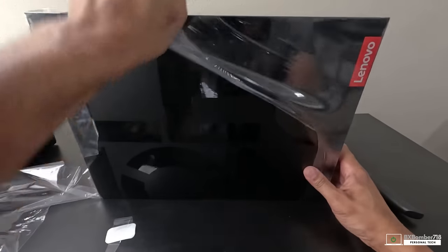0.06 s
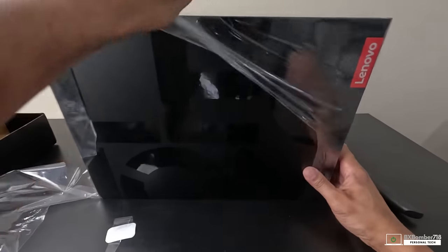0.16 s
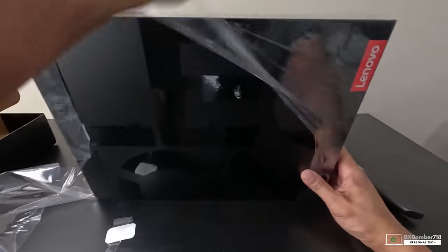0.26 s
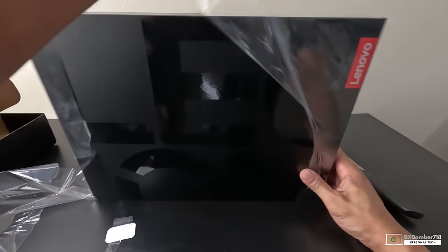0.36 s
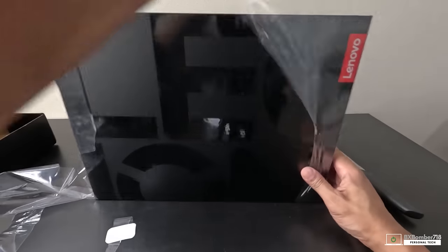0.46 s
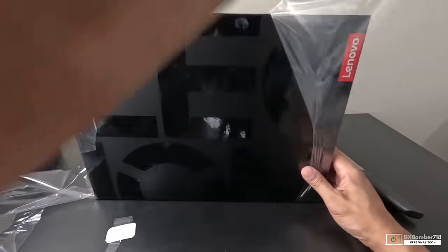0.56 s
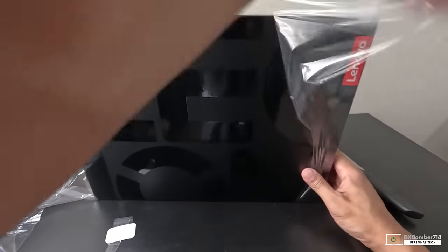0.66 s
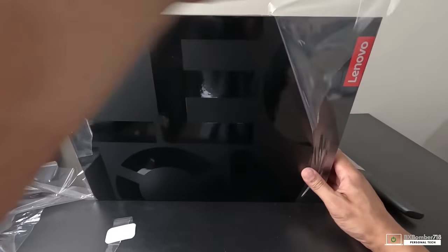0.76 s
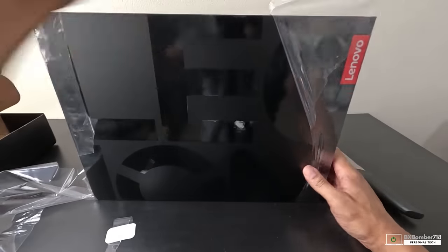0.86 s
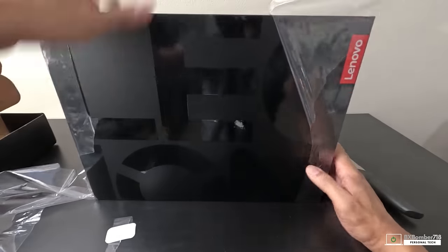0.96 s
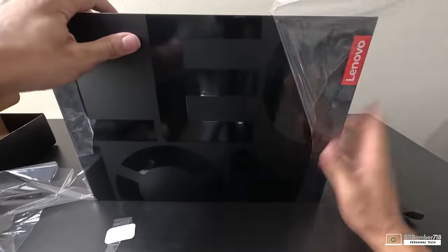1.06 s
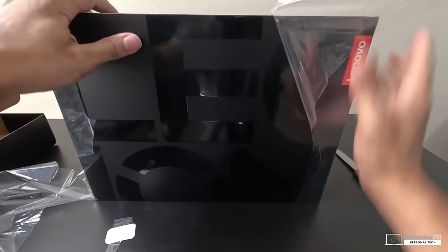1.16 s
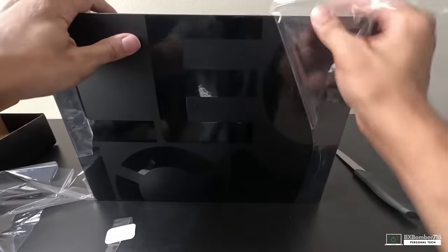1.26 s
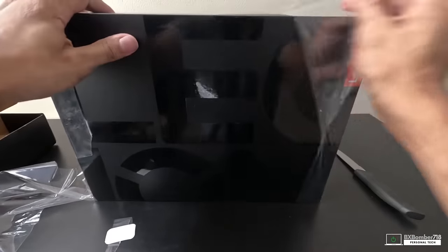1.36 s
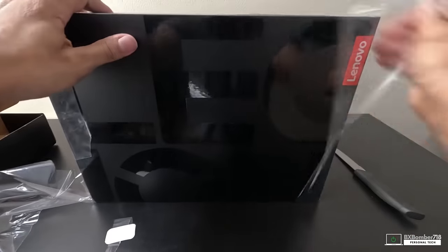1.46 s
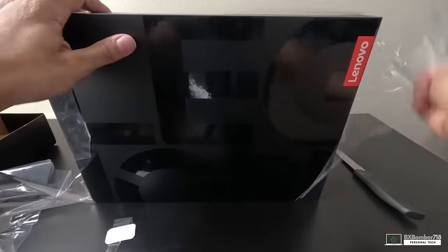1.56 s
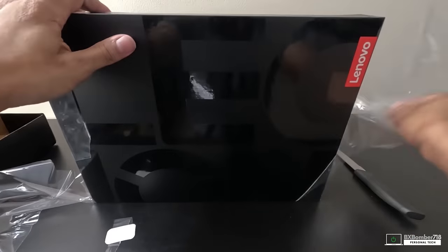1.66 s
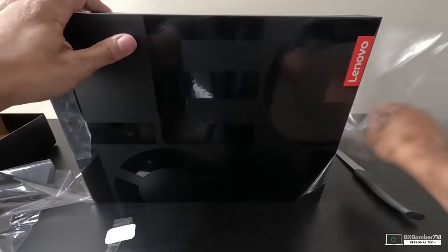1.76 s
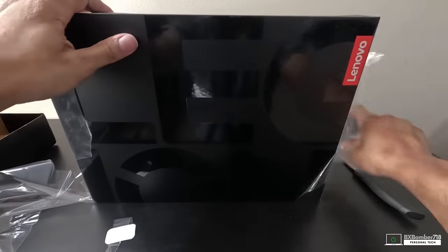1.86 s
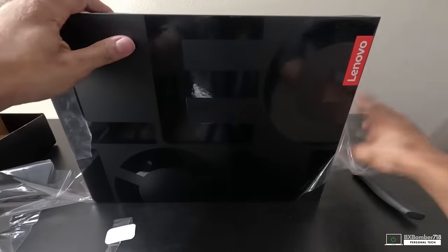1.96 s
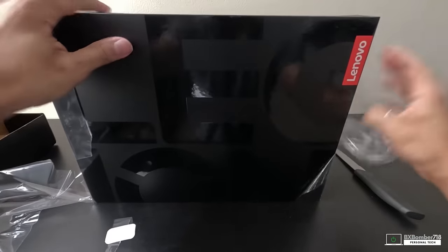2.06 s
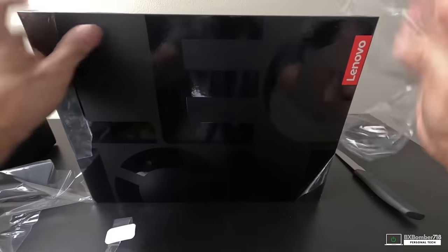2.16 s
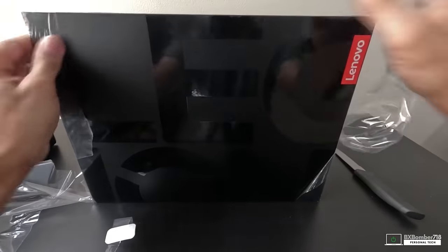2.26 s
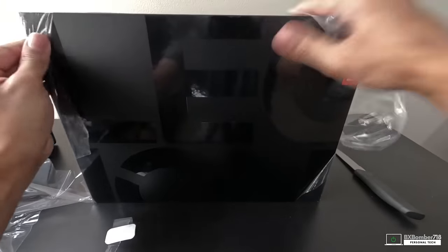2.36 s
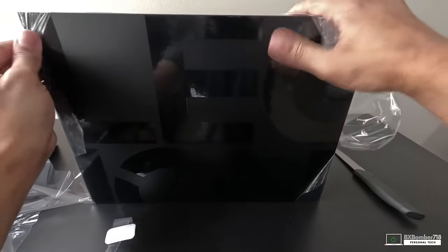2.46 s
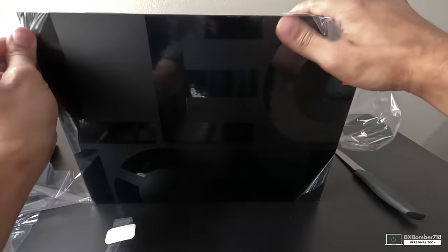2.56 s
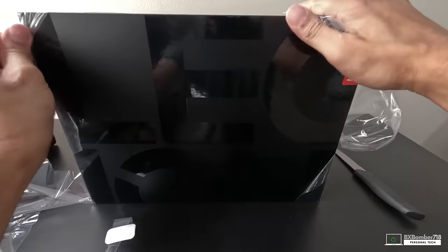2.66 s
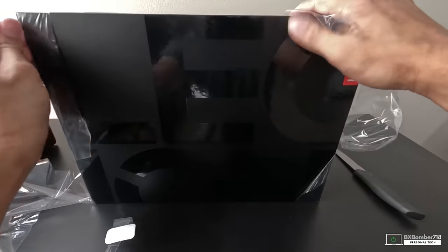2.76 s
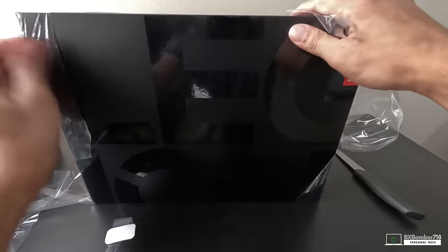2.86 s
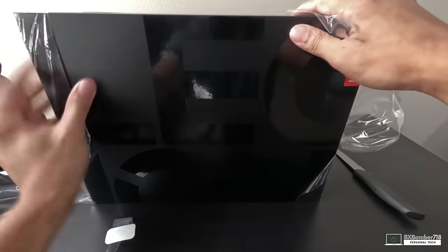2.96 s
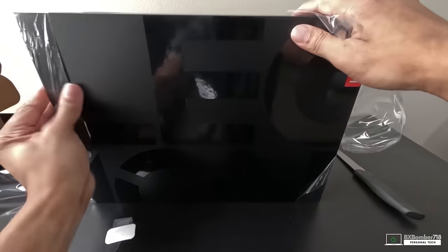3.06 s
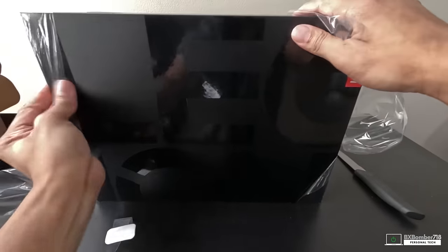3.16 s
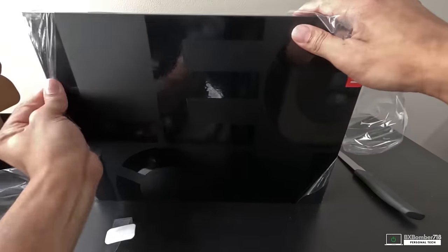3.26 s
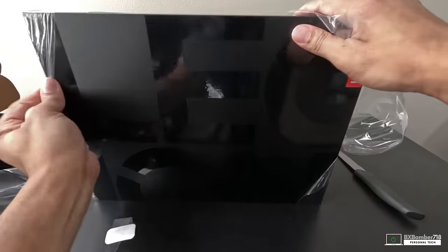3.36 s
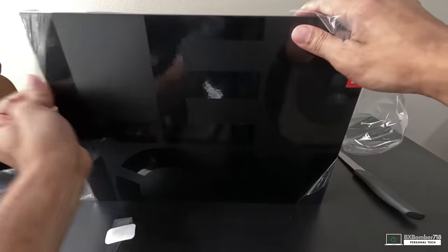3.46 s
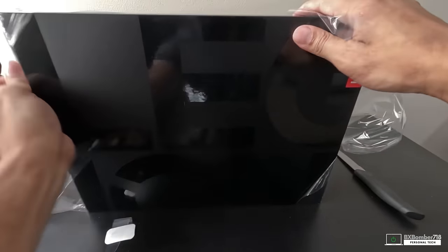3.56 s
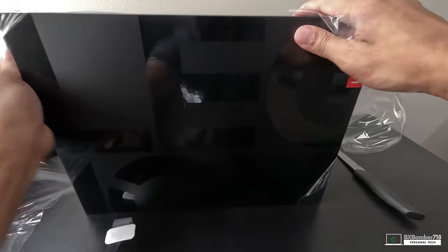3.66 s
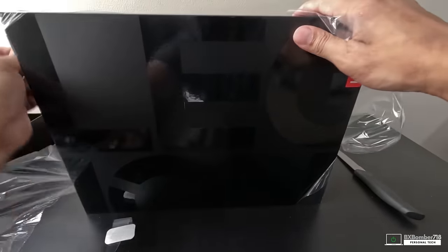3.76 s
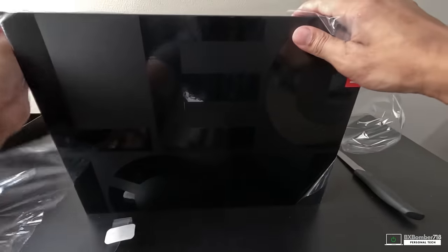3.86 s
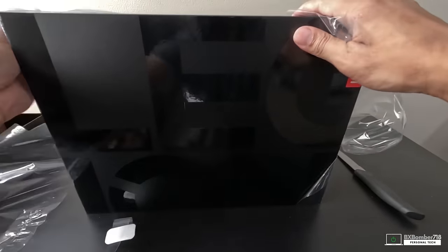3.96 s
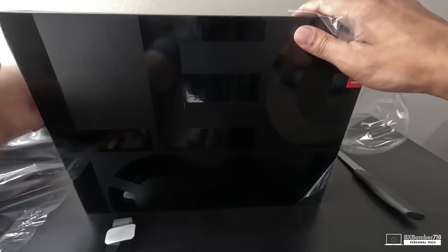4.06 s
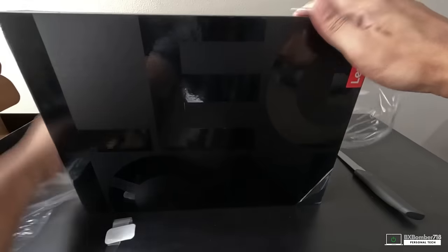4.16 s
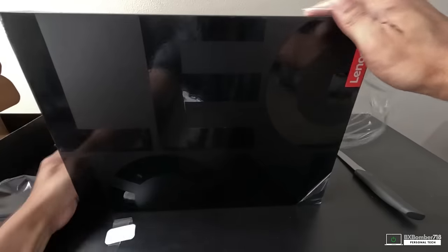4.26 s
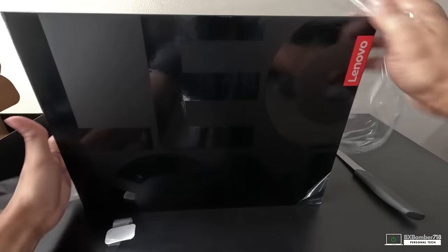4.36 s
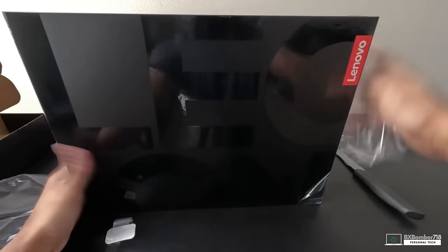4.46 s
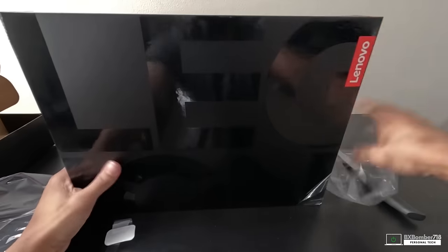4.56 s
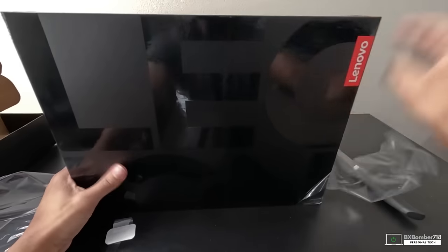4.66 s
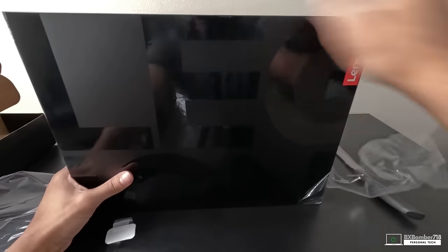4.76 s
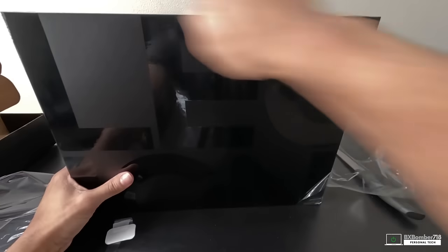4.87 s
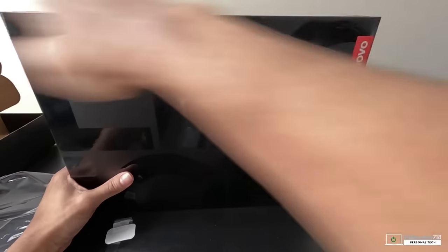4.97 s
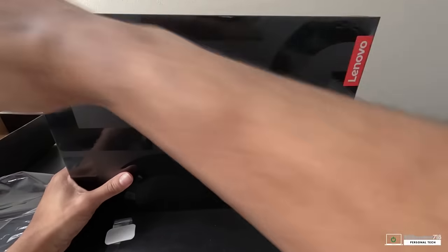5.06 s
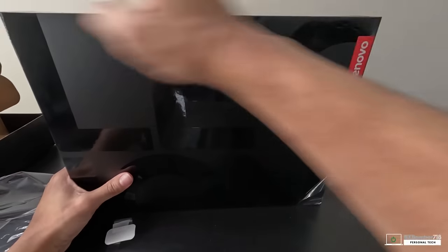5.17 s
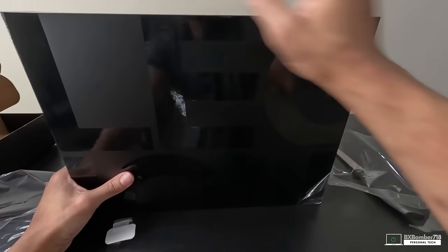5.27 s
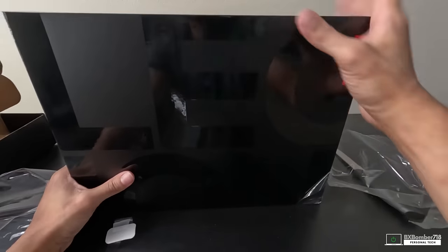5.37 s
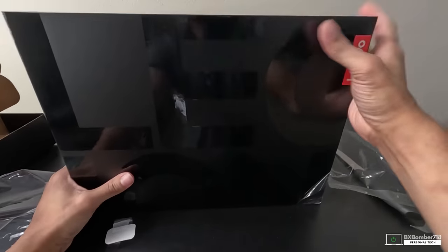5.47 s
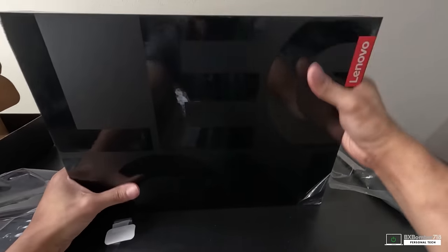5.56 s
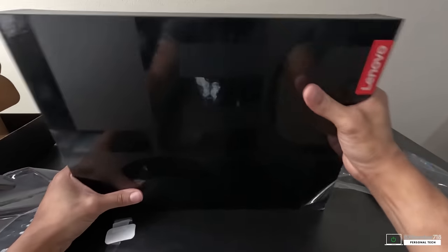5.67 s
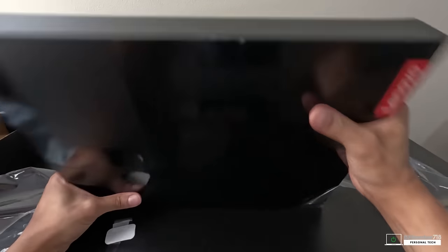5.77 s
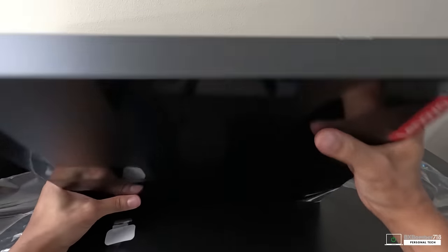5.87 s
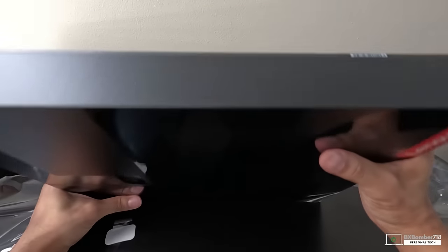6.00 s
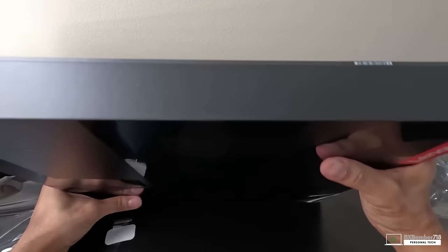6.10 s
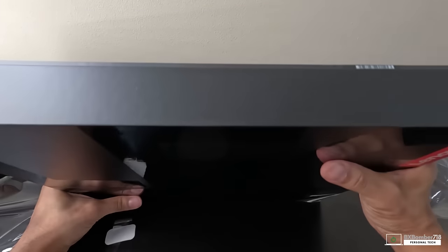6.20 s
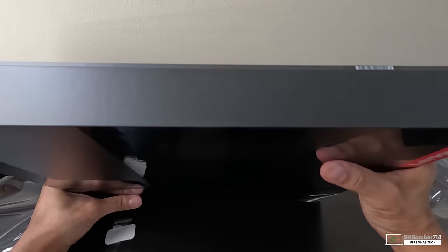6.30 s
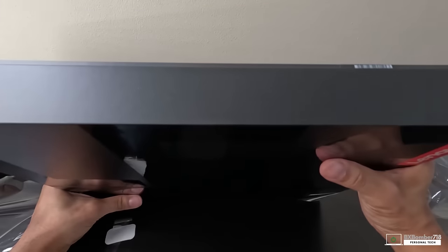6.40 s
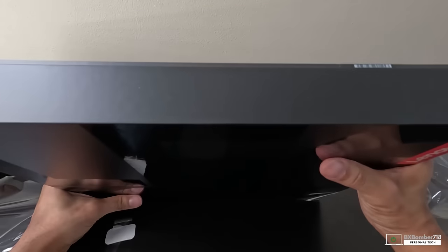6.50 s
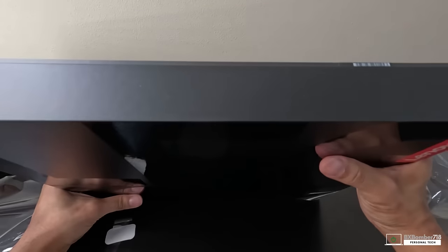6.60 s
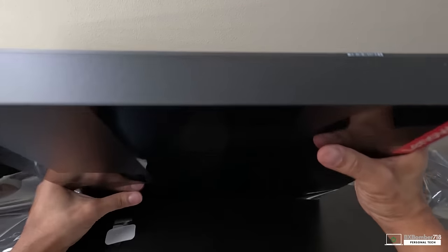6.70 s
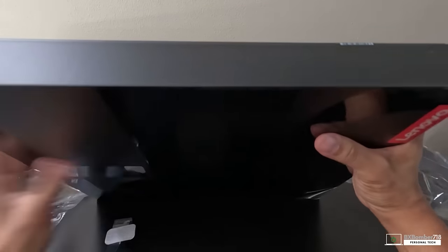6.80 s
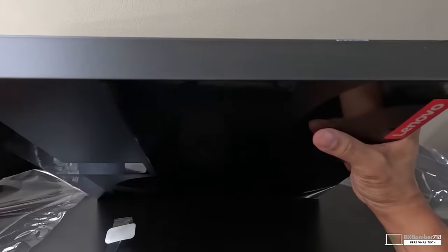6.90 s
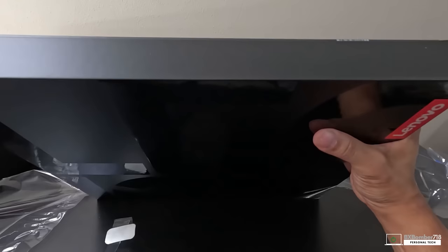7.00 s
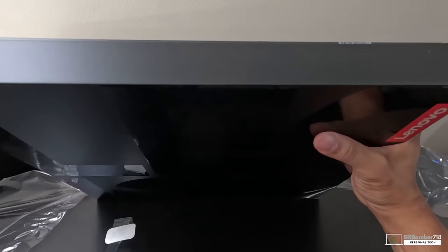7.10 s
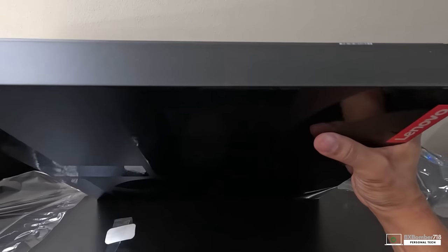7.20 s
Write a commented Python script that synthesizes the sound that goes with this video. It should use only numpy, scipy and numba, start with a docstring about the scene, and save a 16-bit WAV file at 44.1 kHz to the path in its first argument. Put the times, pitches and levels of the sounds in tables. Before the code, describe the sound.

Crisp shrink wrap is peeled in bursts of sharp snaps and rustles, the hollow case thudding under the hands, heard very close indoors.

```python
"""Crisp crackle, sharp snaps and dull thumps: thin shrink film is peeled and torn off a hollow case by hand.
Creases buckle and taut film snaps as dying noise bursts through broad resonances; glue rattles in stick-slip.
Hands knead the case's ringing modes, thump its panels and squeak on it in a rough stack of partials.
Air rumbles under a faint room; two close microphone ports dip near 9 kHz and ring near 12 kHz,
each a little differently."""
import sys
import numpy as np
from scipy import signal
from scipy.fft import rfft, irfft
from scipy.io import wavfile
from scipy.ndimage import uniform_filter1d
from numba import njit

SR = 44100
rng = np.random.default_rng(int(sys.argv[2]) if len(sys.argv) > 2 else 0)


def transcribe(u):
    """Save the signal u as a 16-bit wav file named by the first command-line argument.

    u: samples, shape (n,) or (channels, n), limited to [-1, 1]; the rate is SR.
    q: integer samples, one column per channel.
    """
    v = np.clip(np.atleast_2d(u).T, -1, 1)
    q = np.round(v * 32767).astype(np.int16)
    wavfile.write(sys.argv[1], SR, q)


N = 319284


def undb(db):
    """Turn dB into an amplitude factor."""
    return 10 ** (np.asarray(db) / 20)


def level(x, db):
    """Scale a sound to an RMS level in dB."""
    return x * undb(db) / np.sqrt(np.mean(x ** 2))


def band(x, lo_hz, hi_hz):
    """Keep the sound between two frequencies, with gentle slopes."""
    return signal.sosfilt(signal.butter(2, [lo_hz, hi_hz], "band", fs=SR, output="sos"), x)


def colour(x, points):
    """Causal filter through (Hz, dB) points, built from the cepstrum of the log gain."""
    hz, db = np.transpose(points)
    size = 4096
    grid = np.log(np.arange(size // 2 + 1) * SR / size + 1)
    gain = undb(np.interp(grid, np.log(hz), db))
    cepstrum = irfft(np.log(gain))
    # folding the cepstrum forward in time gives minimum phase
    cepstrum[1:size // 2] *= 2
    cepstrum[size // 2 + 1:] = 0
    impulse = irfft(np.exp(rfft(cepstrum)))
    return signal.fftconvolve(x, impulse)[:N]


@njit
def bursts(drive, start, peak, hz, sharp, t60):
    """Each burst is a quickly rising, then dying drive rung through one resonance, scaled to its peak."""
    out = np.zeros(len(drive))
    for e in range(len(start)):
        n = min(int(t60[e] * SR) + 64, len(drive) - start[e])
        y = np.zeros(n)
        band_state, low_state = 0., 0.
        g = np.tan(np.pi * hz[e] / SR)
        damping = 1 / sharp
        fade = np.exp(-np.log(1000) / (t60[e] * SR))
        envelope = 1.
        for i in range(n):
            rise = min(1., (i + 1) * 30 / n)
            push = envelope * rise * drive[start[e] + i]
            v = (band_state + g * (push - low_state)) / (1 + g * (g + damping))
            band_state = 2 * v - band_state
            low_state += 2 * g * v
            y[i] = v
            envelope *= fade
        out[start[e]:start[e] + n] += y * peak[e] / (np.max(np.abs(y)) + 1e-12)
    return out


def scatter(rate, spread_db):
    """Random moments (rate per s) with mostly small, rarely large sizes, and two spare chances each."""
    draw = rng.random((int(rate) * N // SR, 4))
    start = (draw[:, 0] * (N - 1)).astype(np.int64)
    size = undb(-spread_db * np.log(1 - draw[:, 1]))
    return start, size, draw[:, 2], draw[:, 3]


def gestures(table, fade_db_s, rest_db):
    """Level in dB over time: every row swells, holds and fades; rows add up in power above a rest level."""
    swell_db = 15.5  # a gesture swells to its level from this far below
    settle_db, settle_db_s = -20, 47  # then things settle: a fainter, slower fade
    t = np.arange(0, N, 32) / SR
    start, swell, hold, db = np.asarray(table, float).T[:, :, None]
    since = t - start
    swell = np.abs(swell) + 0.00033  # never quite instant
    after = since - swell - hold
    fade = np.maximum(-fade_db_s * after, settle_db - settle_db_s * after)
    shape = np.minimum(swell_db * (since / swell - 1), np.minimum(0, fade))
    power = undb(2 * rest_db) + np.sum(undb(2 * (db + shape)) * (since >= 0), axis=0)
    return np.interp(np.arange(N) / SR, t, 10 * np.log10(power))


def rustle():
    """Many creases buckle, each with its own pitch and sharp edge; rows: body, edge, second edge."""
    # tugs at the film: start [t/s], swell [t/s], hold [t/s],
    # rustle [level/dB before trim], crisp edges above the rustle [level/dB before trim]
    tugs = [(0, 0.00067, 0.022, -43, -9.5), (0.109, .02, 0.046, -53, -2.5),
            (0.236, 0.0067, 0.099, -47, 0.5), (0.383, 0.026, 0.089, -49, -4), (0.468, .05, 0.11, -42, -1.5),
            (0.675, 0.035, 0.031, -39.5, -1.5), (0.916, 0.023, 0.048, -54, -2),
            (1.023, 0.0091, 0.058, -60, -17), (1.271, 0.052, 0.17, -40, -3.5),
            (1.496, 0.076, 0.059, -34.5, -3), (1.779, .02, .12, -50, -2.5),
            (1.958, .02, 0.052, -52.5, -5.5), (2.041, .1, .04, -46, -3), (2.276, 0.13, 0.017, -41.5, -4.5),
            (2.488, .02, .12, -57, -5.5), (2.712, .01, 0.061, -58.5, 2), (2.802, 0.0081, 0.026, -59.5, -9),
            (2.93, 0.012, 0.051, -68.5, -10), (3.022, 0.058, 0.079, -58.5, -10),
            (3.212, 0.013, 0.024, -53, -8.5), (3.294, 0.022, .06, -61, -8), (3.405, 0.077, 0.22, -47, -7),
            (3.736, 0.035, 0.16, -52, -11), (3.851, 0.014, 0.036, -47, -0.5), (3.963, 0.16, .06, -42, -7),
            (4.184, 0.1, 0.29, -42, -6.5), (4.82, 0.15, 0.088, -57, -11), (5.246, .04, .14, -53, -14),
            (5.518, 0.17, 0.17, -46.5, -16.5), (5.93, 0.025, 0.14, -59.5, -22),
            (6.12, .02, 0.17, -69.5, -27), (6.631, 0.0067, .04, -56.5, -17),
            (6.66, 0.065, 0.049, -45.5, -10), (6.908, 0.0056, 0.098, -71, -13),
            (7.019, 0.022, .2, -63.5, -17.5)]
    # the creases over time: moment [t/s], middle pitch [f/Hz], how unlike their sizes are [0-1.5]
    creases = [(0, 2100, .9), (.3, 2000, 1.0), (.45, 2000, 1.25), (.75, 2900, 1.25), (1.1, 2500, 1.2),
               (1.45, 2300, 1.15), (1.9, 2800, 1.0), (2.8, 2800, 1.1), (3.2, 1900, 1.1), (3.8, 1650, .8),
               (4.35, 2500, .6), (4.7, 1900, .8), (5.4, 1500, .8), (5.8, 2000, .7), (6.0, 1350, .5),
               (6.3, 1300, .5), (6.7, 1700, .8), (7.24, 1500, .8)]
    *timing, db, crisp_db = np.transpose(tugs)
    # fades in dB/s; the rest levels are there because the film never lies quite still
    rustle_db = gestures(np.transpose([*timing, db]), fade_db_s=136.5, rest_db=-96.5)
    edge_db = gestures(np.transpose([*timing, db + crisp_db]), fade_db_s=186, rest_db=-99.5)
    s, *columns = np.transpose(creases)
    middle_hz, unlike = (np.interp(np.arange(N) / SR, s, c) for c in columns)

    start, size, pitch, length = scatter(rate=1100, spread_db=2.5)
    # dull rubbing is even, crisp film breaks into ticks of very unlike size, and shorter ones
    size = size ** np.clip(unlike[start], .2, 1.5)
    t60 = (.004 + .018 * length) / (.4 + .8 * unlike[start] ** 2)
    # most creases gather near the middle pitch, some stray far from it
    hz = middle_hz[start] * 2 ** (1.51 * np.sign(pitch - .5) * (2 * pitch - 1) ** 2)
    noise = rng.standard_normal((3, N))
    body = bursts(noise[0] + .8, start, size, hz, 2.2, t60)
    # higher creases have the stronger edges
    edge_size = size * undb(8 * (pitch - .5))
    edge_hz = np.full_like(t60, 7060.0)
    edges = [level(bursts(n, start, edge_size, edge_hz, 0.74, t60), 3.9) for n in noise[1:]]
    return np.array([undb(rustle_db) * level(body, 3.3), undb(edge_db) * edges[0], undb(edge_db) * edges[1]])


def case(push):
    """The hollow case rings in its short modes."""
    # modes of the case: pitch [f/Hz], relative [level/dB], decay by 60 dB [t/s]
    case_modes = [(123, -21, 0.3), (228, -19, 0.24), (270, 7.5, 0.038), (349, 4, 0.032), (419, 5.5, 0.031),
                  (676, -8, 0.035), (770, -14, 0.12)]
    t = np.arange(SR // 4) / SR
    ring = sum(undb(db) * np.sin(2 * np.pi * hz * t) * np.exp(-np.log(1000) * t / t60)
               for hz, db, t60 in case_modes)
    return signal.fftconvolve(push, ring / np.max(np.abs(ring)))[:N]


def grip():
    """Fingers and tugging film knead the case with many small soft pushes."""
    # hands press on the case: start [t/s], swell [t/s], hold [t/s], load [level/dB before trims]
    grips = [(0, .002, 0.17, -51.5), (.24, .04, 0.13, -42), (.42, 0.042, 0.12, -42.5),
             (.7, 0.027, 0.036, -45.5), (1.03, .01, 0.13, -51), (1.29, 0.045, 0.16, -40),
             (1.5, 0.052, 0.066, -29), (1.78, 0.076, 0.52, -57), (2.06, 0.016, 0.36, -52.5),
             (2.37, 0.017, 0.025, -42), (2.73, 0.023, 0.055, -51), (2.9, 0.021, 0.021, -54.5),
             (3.02, .05, 0.4, -60), (3.48, 0.087, 0.12, -38), (3.63, 0.011, 0.062, -47),
             (3.75, 0.014, 0.055, -51.5), (3.87, 0.017, 0.047, -45), (3.99, 0.0067, 0.3, -44.5),
             (4.33, 0.044, 0.11, -43), (4.46, 0.029, 0.14, -45), (4.84, 0.017, 0.071, -51.5),
             (5.0, 0.028, 0.046, -46.5), (5.33, 0.06, 0.033, -44.5), (5.55, 0.093, 0.038, -44.5),
             (5.79, 0.013, 0.071, -39), (5.94, 0.012, 0.036, -47.5), (6.1, 0.029, 0.12, -57.5),
             (6.64, .11, 0.079, -44.5), (6.89, 0.0089, 0.025, -49), (7.07, 0.0085, .15, -53.5)]
    load_db = gestures(grips, fade_db_s=139, rest_db=-67)  # the case never lies quite still
    start, size, pitch, length = scatter(rate=500, spread_db=1.2)
    hz, t60 = 125 * 2 ** (2.3 * pitch), 0.0022 + 0.11 * length
    knead = bursts(rng.standard_normal(N), start, size, hz, 0.96, t60)
    ringing = level(case(knead), -3.0)
    direct = level(band(knead, 79, 980), 0.3)
    return undb(load_db) * band(ringing + direct, 130, 2500)


def walls(x):
    """A small furnished room answers with a short dull tail."""
    t = np.arange(SR // 3) / SR
    tail = band(rng.standard_normal(len(t)), 100, 9000)
    tail *= np.exp(-np.log(1000) * t / 0.12) * (t > .004)  # dies in 0.12 s, after a 4 ms gap
    return signal.fftconvolve(x, tail / np.sqrt(np.sum(tail ** 2)))[:N]


def room_tone():
    """The faint steady bed of the room is noise, heaviest in the deep bass."""
    # tilt of the bed: [f/Hz], relative density [level/dB]
    room_curve = [(18, -43.5), (30, 1.5), (93, -15.5), (111, -13.5), (272, -25), (587, -20.5), (2730, -36),
                  (8220, -57), (13700, -56.5)]
    return level(colour(rng.standard_normal(N), room_curve), -60)


def draught():
    """Moving air buffets the ports with a low uneven rumble."""
    # gusts pushed past the ports by the arms and the flapping sheet:
    # start [t/s], swell [t/s], hold [t/s], gust [level/dB before trim]
    gusts = [(.45, 0.14, .03, -44.5), (1.03, .02, .1, -55), (1.48, 0.12, 0.018, -35),
             (2.08, 0.06, 0.1, -58), (4.4, 0.099, .03, -59)]
    gust_db = gestures(gusts, fade_db_s=143, rest_db=-66.5)
    return level(band(rng.standard_normal(N), 35, 87), 4.0) * undb(gust_db)


def snaps():
    """Taut film lets go: a pitched crack, a broad body and a bright edge (rows as in the rustle)."""
    # loud snaps of the film: moment [t/s], peak before trims [level/dB], pitch [f/Hz],
    # crisp edge relative to the peak before trim [level/dB]
    snap_hits = [(0.0534, -26, 1090, -11), (0.1213, -31, 3630, -9), (0.2461, -15.5, 2140, -8.5),
                 (0.2637, -24, 920, -17), (0.3366, -13, 3200, -3.5), (0.4868, -19.5, 5870, -13),
                 (.5334, -22, 950, -36), (.519, -18, 4350, -17), (.557, -23, 870, -3),
                 (0.595, -29, 6000, -20), (.637, -27, 2260, 1), (.664, -32, 6000, 7.5),
                 (0.6231, -23.5, 1660, 6), (0.6953, -26, 3750, -6), (0.7366, -27, 2450, -4),
                 (0.7451, -15, 4470, -1), (0.759, -20, 2940, -0.5), (0.7938, -24.5, 3360, -10),
                 (0.8228, -36, 2970, 1), (.9425, -35.5, 3980, -2), (1.0384, -32, 3400, -8),
                 (1.085, -32, 1910, -27), (1.272, -62.5, 2000, 18), (1.2894, -30, 6500, 3),
                 (1.296, -24.5, 5090, -17), (1.3142, -22, 2560, -16), (1.3243, -31.5, 1870, 6.5),
                 (1.3464, -18, 2280, -4), (1.365, -11, 3110, -9), (1.402, -21.5, 890, -25),
                 (1.4055, -21.5, 2830, -22), (1.457, -24.5, 890, -19), (1.5263, -15.5, 2400, -5.5),
                 (1.543, -15, 1910, -17), (1.561, -19, 1200, -26), (1.574, -10, 2620, -15.5),
                 (1.578, -6, 2430, -15), (1.6121, -13, 3250, -4.5), (1.623, -14, 1870, -4),
                 (1.6315, -14, 3180, -8.5), (1.7124, -22, 2240, -2.5), (1.8005, -25.5, 3730, -6),
                 (1.8622, -24, 3320, -10), (1.9104, -26, 3480, -7), (2.2005, -26, 4250, -11),
                 (2.3223, -30, 4800, -0.5), (2.3863, -17, 4320, -16), (2.4015, -21, 2150, -6),
                 (2.5542, -25.5, 3600, -2), (2.6456, -41.5, 2280, -31), (2.7375, -14.5, 3830, 2.5),
                 (2.7403, -22.5, 1580, -12), (2.7603, -28.5, 1650, 1.5), (2.7715, -26, 3610, -11.5),
                 (2.853, -41.5, 5500, -8), (2.934, -42, 4500, -12), (3.0274, -42, 2250, -8),
                 (3.0847, -38.5, 1280, -10), (3.067, -39, 3300, -25), (3.127, -40, 5800, -4),
                 (3.2368, -30, 5800, -10), (3.24, -30, 1880, -5.5), (3.3267, -32.5, 1760, -13),
                 (3.4299, -30.5, 3720, -4.5), (3.4735, -35.5, 1690, -2), (3.494, -19.5, 4640, -9.5),
                 (3.5147, -27, 1610, -17), (3.5547, -21, 2970, -19), (3.6367, -4, 1750, -26),
                 (3.7502, -29, 1450, -34), (3.8011, -27.5, 1600, -28), (3.8774, -16, 1620, -28),
                 (3.894, -19, 1660, -15), (3.997, -15.5, 2940, -18), (4.1207, -22, 1920, -21),
                 (4.1588, -32, 2730, -18), (4.2856, -21.5, 1930, -23), (4.4408, -21, 3440, -15),
                 (4.506, -18.5, 1550, -30), (4.8426, -38, 1560, -26), (5.0466, -33.5, 1590, -29),
                 (5.279, -35.5, 990, -15), (5.3166, -28, 1760, -29), (5.3399, -25.5, 1580, -15),
                 (5.3965, -28, 985, -40), (5.4648, -30, 1640, -14), (5.6746, -22.5, 1800, -38),
                 (5.7024, -27, 1320, -20), (5.7658, -28, 2160, -30), (5.8622, -25, 1810, -21),
                 (5.8819, -25.5, 2400, -27), (6.0616, -35, 1240, -35), (6.29, -50, 2400, -19),
                 (6.561, -46, 6500, 0.5), (6.6066, -39.5, 1000, -30), (6.6443, -35, 870, -28),
                 (6.711, -25, 1380, -31), (6.7267, -29, 1200, -29), (6.7945, -21, 1100, -11.5),
                 (6.898, -37, 3300, -14), (7.082, -40, 900, -15), (7.143, -42, 900, -20)]
    s, db, hz, edge_db = np.transpose(snap_hits)
    start = (s * SR).astype(np.int64)
    t60 = 0.0065 + 23.6 / hz  # a fixed time in s plus a number of cycles of the pitch
    noise = rng.standard_normal((4, N))
    # the steady part of the drive is the sudden release, the noise is the tearing after it
    crack = bursts(noise[0] + 1.5, start, undb(db - 3), hz, 3.0, t60)
    broad = bursts(noise[3] + 1.1, start, undb(db), 0.97 * hz, 0.8, 0.16 * t60)
    edge_peak, edge_hz = undb(db + edge_db + 2.0), np.full_like(s, 8900.0)
    edges = [bursts(n, start, edge_peak, edge_hz, 0.54, 0.6 * t60) for n in noise[1:3]]
    return np.array([crack + broad, *edges])


def thumps():
    """Each blow bends one panel, which rings briefly while the contact knocks near 413 Hz."""
    # thumps on the case: moment [t/s], panel peak before the band filter [level/dB],
    # pitch of the struck panel [f/Hz]
    blows = [(0.2476, -29.5, 110), (0.3336, -24, 267), (0.3552, -16.5, 327), (.378, -29, 330),
             (.536, -25.5, 138), (0.711, -29.5, 119), (1.036, -33.5, 195), (1.1004, -23.5, 353),
             (1.125, -32, 304), (1.1515, -31.5, 328), (1.3184, -29, 357), (1.3638, -26.5, 258),
             (1.5518, -12.5, 292), (1.5738, -11.5, 130), (1.5965, -20, 250), (1.613, -15.5, 291),
             (1.6353, -14, 220), (1.7059, -25, 256), (2.1105, -28, 255), (2.16, -32, 267),
             (2.3953, -27.5, 260), (2.741, -28, 236), (2.771, -36, 236), (3.5157, -23.5, 354),
             (3.547, -31, 136), (3.6371, -5.5, 284), (3.666, -19.5, 276), (3.689, -27, 300),
             (3.8814, -21.5, 408), (3.9993, -20, 237), (4.1227, -26.5, 238), (4.15, -25.5, 275),
             (4.253, -28.5, 215), (4.324, -31.5, 105), (4.405, -31, 198), (4.436, -36, 198),
             (4.515, -28, 109), (4.5864, -23, 675), (4.8448, -33, 354), (5.0152, -28.5, 194),
             (5.0522, -23.5, 310), (5.3627, -29.5, 185), (5.4094, -29.5, 310), (5.565, -33, 304),
             (5.6494, -30, 151), (5.8355, -29, 615), (5.8538, -29, 207), (5.948, -26.5, 342),
             (6.1292, -34, 124), (6.7742, -29.5, 219), (6.82, -29, 394), (6.9023, -30, 320),
             (6.983, -36, 193), (7.0838, -40, 213), (7.1451, -34.5, 214)]
    s, db, hz = np.transpose(blows)
    start = (s * SR).astype(np.int64)
    panel = bursts(np.ones(N), start, undb(db), hz, 4.74, 11 / hz)
    knock_hz, knock_t60 = np.full_like(s, 413.0), np.full_like(s, 0.032)
    knock = bursts(rng.standard_normal(N), start, undb(db - 4.0), knock_hz, 1.5, knock_t60)
    return band(panel + knock, 130, 1500)


def rattle():
    """Glued film peels in even, slowing stick-slips of the peel line, each a short dry tick."""
    span_s, slips_per_s = (.408, .482), (175, 115)  # from start to end
    peak_db, pitch_hz, t60_s = -27, 2400, 0.0014
    t = np.arange(N) / SR
    slips = np.cumsum(np.interp(t, span_s, slips_per_s, left=0, right=0)) / SR
    start = np.flatnonzero(np.diff(np.floor(slips)))
    size = undb(peak_db + 2 * rng.standard_normal(len(start)))  # ticks vary by about 2 dB
    return bursts(np.ones(N), start, size, np.full_like(size, pitch_hz), 0.42, np.full_like(size, t60_s))


def squeak():
    """Stick-slip of skin: a slightly rough stack, strongest on its second and third partials."""
    # a palm slips on the glossy panel: moment [t/s], slip rate [f/Hz], second partial [level/dB]
    palm_slip = [(6.1, 1020, -80), (6.14, 1012, -61), (6.17, 1000, -69), (6.19, 1005, -63),
                 (6.27, 985, -74)]
    s, hz, db = np.transpose(palm_slip)
    t = np.arange(N) / SR
    waver = 1 + .3 * uniform_filter1d(rng.standard_normal(N), size=200)
    phase = 2 * np.pi * np.cumsum(np.interp(t, s, hz) * waver) / SR
    stack = undb(-5) * np.sin(phase) + np.sin(2 * phase) + undb(-2) * np.sin(3 * phase)
    return stack * undb(np.interp(t, s, db, left=-200, right=-200))


def scene():
    """Film, hands, air and room add up at two ports, as what they share plus or minus what differs."""
    body, edge, other_edge = rustle() + snaps()
    # a soft fold carries no top treble; only its edge does
    film = band(body + rattle(), 160, 6300) + edge
    near = film + thumps() + grip() + squeak()
    air = room_tone() + draught()
    wet = walls(near)
    both = near + undb(-20) * wet + air
    # the finest edges and a little of the room reach the two ports by different paths
    apart = 0.96 * band(other_edge, 10000, 15000) - .3 * edge - .6 * band(edge, 3000, 9000)
    apart += undb(-24.0) * wet
    return np.array([both + apart, both - apart])


def record(dry):
    """Two close ports colour what they share and what they hear apart; peaks are rounded and the top is cut."""
    # response of the ports to what they share: [f/Hz], gain [level/dB]
    shared_curve = [(30, -14), (80, -2.5), (3000, 1), (7200, -0.5), (8700, -8.5), (9100, -17), (9500, -7),
                    (11800, 8.5), (12700, 1.5), (13700, -13)]
    # response of the ports to where they differ: [f/Hz], gain [level/dB]
    split_curve = [(300, -31.5), (3500, -41.5), (4500, -14), (9500, -23.5), (11000, -6.5), (12200, 4),
                   (12900, 2), (13700, -34.5)]
    mid = colour((dry[0] + dry[1]) / 2, shared_curve)
    side = colour((dry[0] - dry[1]) / 2, split_curve)
    rounded = 2 * np.tanh(np.array([mid + side, mid - side]) / 2)
    steep = signal.ellip(8, .3, 30, 13870, fs=SR, output="sos")  # cut-off in Hz
    soft = signal.butter(8, 15000, fs=SR, output="sos")
    return signal.sosfilt(np.vstack([steep, soft]), rounded)


dry = scene()
out = record(dry)
transcribe(out)
```